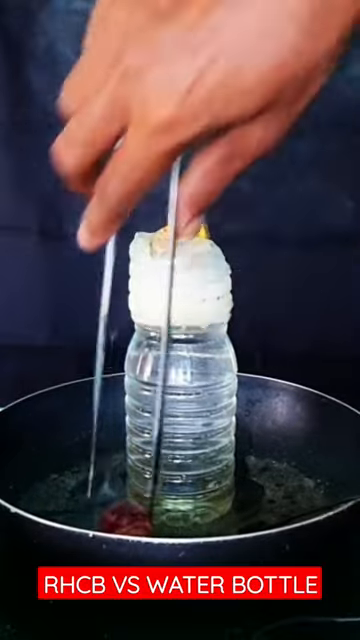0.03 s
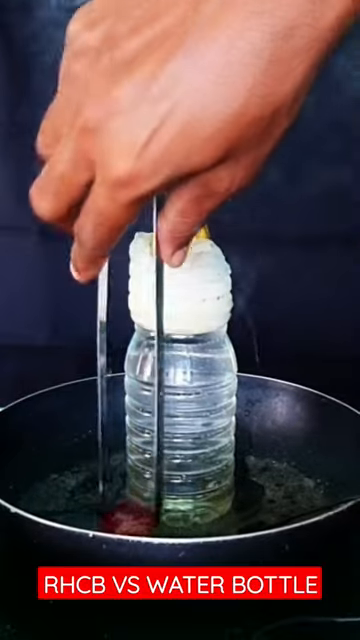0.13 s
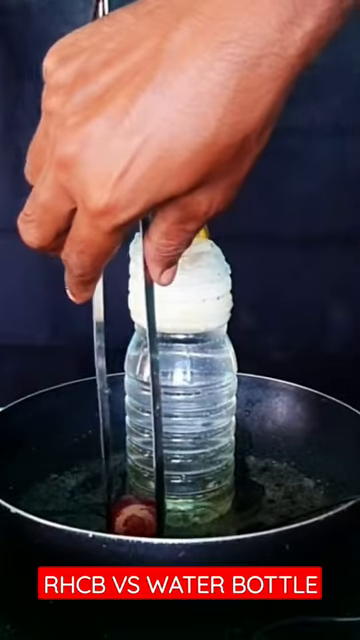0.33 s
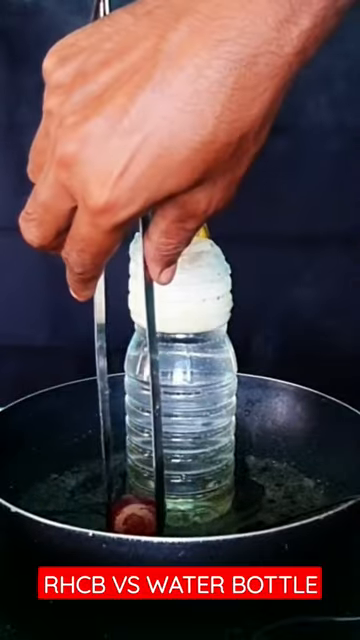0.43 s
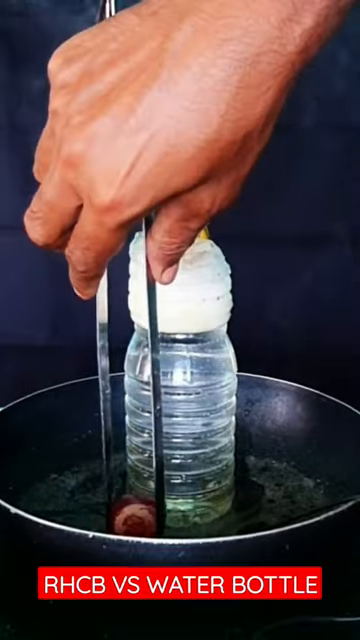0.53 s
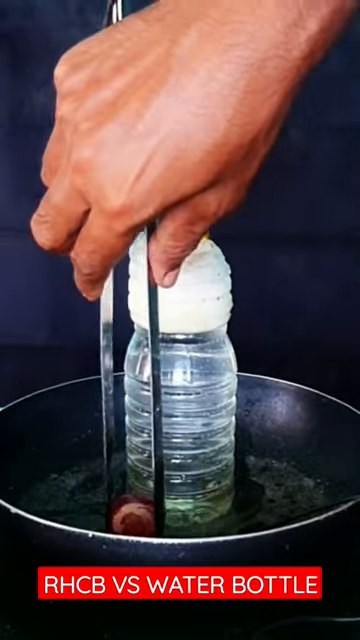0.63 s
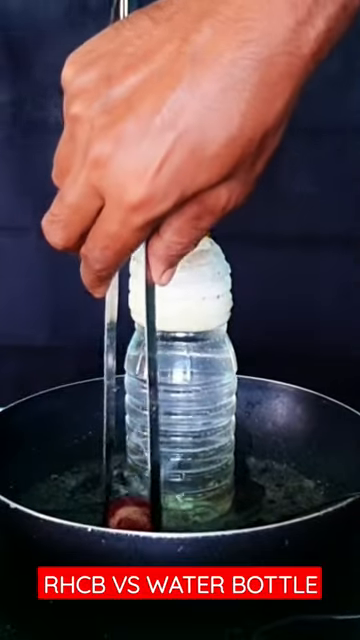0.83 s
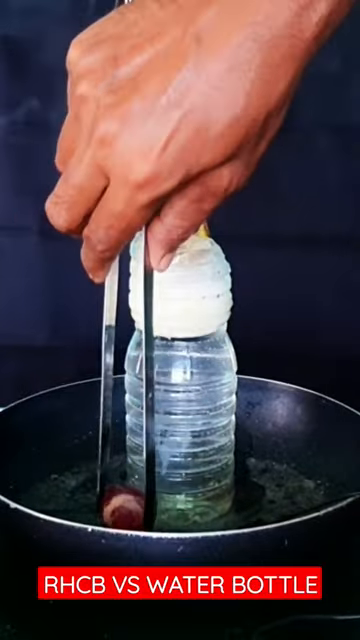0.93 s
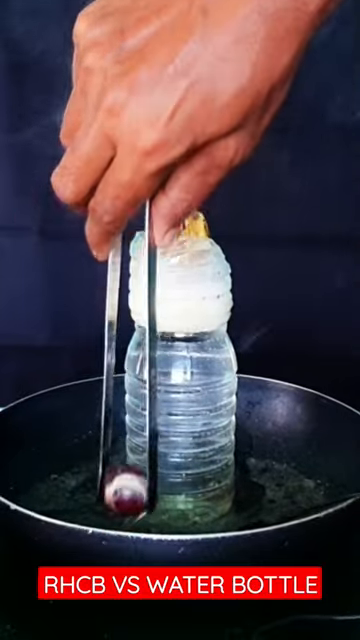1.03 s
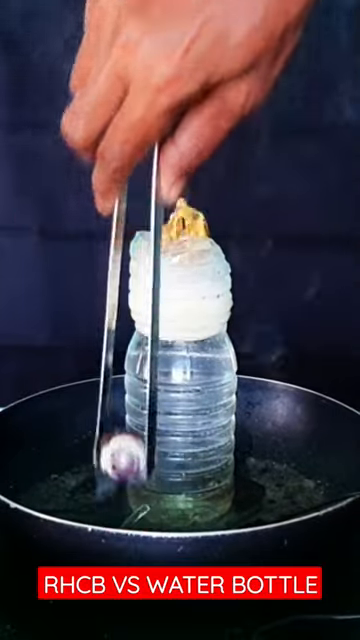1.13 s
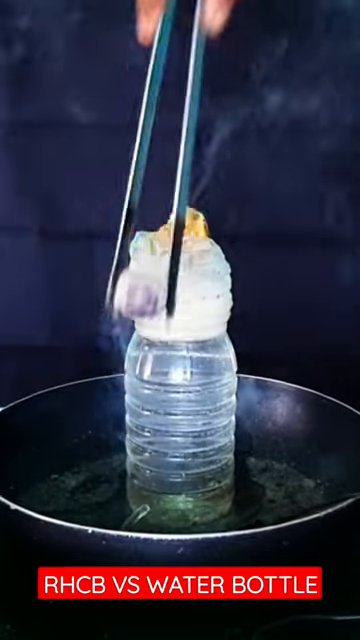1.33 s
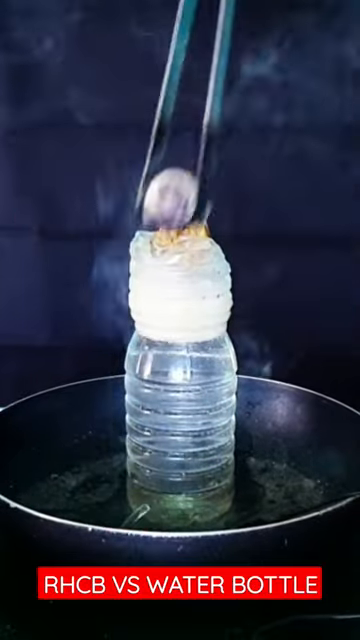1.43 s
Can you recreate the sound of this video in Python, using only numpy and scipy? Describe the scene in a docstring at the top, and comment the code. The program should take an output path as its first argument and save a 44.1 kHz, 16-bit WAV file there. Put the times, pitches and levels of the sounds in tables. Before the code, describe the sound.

A red-hot metal ball sizzles in shallow liquid in a frying pan. After a few faint ticks of tongs, it hisses, spits and bubbles close by, then sputters in high chirps as it is lifted and fizzes away.

```python
"""A red-hot metal ball hisses and spits in a shallow pool of liquid in a frying pan.
Tiny steam bursts crackle and ring a few broad resonances, larger bubbles plop, and the fluttering
vapour film shakes the level. A few ticks come first, as tongs set the ball down. On the lift it
sputters in sharp chirps, then the film left on it fizzes away in the air."""
import sys
import numpy as np
from scipy import signal
from scipy.fft import rfft, irfft, next_fast_len
from scipy.io import wavfile
from scipy.ndimage import map_coordinates

SR = 44100
rng = np.random.default_rng(int(sys.argv[2]) if len(sys.argv) > 2 else 0)


def bounce(signal):
    """Save signal as a 16-bit WAV file at the path given by the first command-line argument."""
    frames = np.transpose(np.atleast_2d(signal))
    limited = np.clip(frames, -1, 1)
    pcm = np.round(limited * 32767).astype(np.int16)
    wavfile.write(sys.argv[1], SR, pcm)


N = 66150

# room noise spectrum: freq_hz, gain_db
ROOM_EQ = [(20, -19), (55, 12), (75, 6), (100, 13), (135, -17), (200, -1.5), (400, -9.5), (1500, -26),
           (6000, -15), (15000, -18)]
# ticks as the ball nears the pan: start_s, drive_db
TICK_HITS = [(.042, -27), (.0447, -23.5), (.0515, -36), (.091, -41), (.0993, -37.5), (.1248, -32.5),
             (.151, -51), (.2177, -37)]
# tick spectrum: freq_hz, gain_db
TICK_EQ = [(100, -6.5), (450, -4.5), (750, 10), (1000, -5), (3400, -15), (4800, 3), (5900, -2), (7000, 4),
           (9000, -5), (10300, 6), (12500, -18), (15400, -12)]
# duller knocks among the ticks: start_s, drive_db
KNOCK_HITS = [(.0402, -34.5), (.0515, -42), (.1063, -37.5), (.172, -45.5)]
# knock spectrum: freq_hz, gain_db
KNOCK_EQ = [(100, -5), (500, -8), (800, 17), (1050, 2), (1400, 10.5), (3400, 1.5), (4800, 10), (6000, -10),
            (15000, -3)]
# spectrum of the closing pool: freq_hz, gain_db
SLOSH_EQ = [(30, -3), (70, 0), (210, 3), (400, -9), (1500, -29)]
# dull simmer of the liquid: time_s, level_db
SIMMER_ENV = [(.22, -69), (.26, -49), (.4, -41.5), (.7, -43), (.95, -40.5), (1.1, -38), (1.22, -39),
              (1.33, -42), (1.42, -47), (1.5, -49)]
# simmer spectrum: freq_hz, gain_db
SIMMER_EQ = [(40, -13.5), (190, -7), (420, -4), (1200, 1.5), (1850, 0), (2300, -4), (5000, -65.5)]
# ringing just before the lift: time_s, level_db
RING_ENV = [(.76, -110), (.82, -37), (.9, -26), (.962, -30), (.97, -21.5), (.99, -39), (1.04, -36.5),
            (1.1, -80)]
# resonances of that ringing: freq_hz, width_hz, gain_db
RING_BANDS = [(906, 200, -11.5), (1300, 110, -7), (2020, 91, -2)]
# whistling steam pockets: start_s, length_s, pitch_hz, level_db
WHISTLE_NOTES = [(.885, .075, 1935, -31), (.908, .04, 1290, -36), (.967, .027, 1960, -17.5),
                 (.968, .02, 890, -33), (.993, .055, 1240, -33), (.995, .07, 1915, -33)]
# large bubbles: start_s, pitch_hz, life_s, level_db
LARGE_BUBBLES = [(0.252, 2270, 0.0083, -19), (.279, 1420, 0.012, -28), (0.382, 959, 0.015, -25),
                 (0.396, 571, 0.0071, -35.5), (0.427, 880, 0.0048, -27.5), (.434, 536, 0.0093, -38),
                 (.574, 939, 0.017, -30.5)]
# small squeaking bubbles: start_s, pitch_hz, life_s, level_db
SMALL_BUBBLES = [(.391, 6140, 0.0022, -12), (.396, 7020, 0.0033, -21), (.604, 6130, 0.003, -23),
                 (.6095, 5050, .005, -17), (.6145, 6700, 0.0034, -25), (.669, 3000, 0.0039, -16),
                 (1.1995, 6920, .003, -20)]
# steam jet resonance: freq_hz, width_hz, gain_db
JET_BANDS = [(9100, 2900, 0)]
# spectrum of liquid boiling off the rising ball: freq_hz, gain_db
DRAIN_EQ = [(1000, -44), (2250, -4), (2600, 7.5), (3300, 9), (4000, 7), (5200, 4.5), (7000, 2.5),
            (15000, -30)]
# droplets popping on the metal: start_s, drive_db
DROPLET_POPS = [(.8435, -2), (1.306, -10), (1.3126, -9), (1.3225, -10), (1.379, -11), (1.3955, -14),
                (1.4454, -11)]
# collapsing steam pockets: start_s, length_s, level_db
SPIT_BURSTS = [(0.274, 0.0062, -21), (0.5445, 0.0096, -16), (0.674, 0.008, -44), (0.754, 0.0086, -18)]
# spit spectrum: freq_hz, gain_db
SPIT_EQ = [(200, -35), (900, -4.5), (1600, 0), (2100, 7), (3000, 6.5), (4100, 6), (4700, 3), (6400, 6),
           (8200, 1), (11000, 3), (15400, -11)]
# rushes of steam: start_s, length_s, level_db
SURGE_BURSTS = [(0.228, 0.0053, -31), (0.248, 0.012, -17.5), (0.323, 0.0095, -20.5), (0.341, 0.0087, -20.5),
                (0.352, 0.0045, -15), (0.358, 0.0061, -22), (0.374, 0.017, -19.5), (0.394, 0.0095, -15),
                (0.414, 0.016, -20.5), (0.429, 0.0194, -15), (0.722, 0.0091, -17), (0.774, 0.017, -17),
                (1.156, 0.0028, -9.5), (1.186, 0.012, -27)]
# surge spectrum: freq_hz, gain_db
SURGE_EQ = [(2000, -24), (4000, -13.5), (4900, -6.5), (5500, 4.5), (6600, 7), (7500, 3.5), (8400, 7.5),
            (10500, -5), (15400, -5.5)]
# chirps as the ball leaves the pool: time_s, pitch_hz, level_db
SPUTTER_ENV = [(.992, 11550, -34), (1, 9500, -5), (1.018, 7300, -12), (1.05, 7030, -7), (1.085, 5864, -8.5),
               (1.125, 6050, -8), (1.145, 5550, -15), (1.163, 6720, -6.5), (1.18, 7900, -38)]
# vapour film flutter, calmer in the air: time_s, depth_ratio
FLUTTER_ENV = [(1.16, 1.01), (1.21, 0.64)]
# boiling under the ball: time_s, level_db, pitch_ratio
BOIL_ENV = [(.228, -66, 1.16), (.25, -34.5, 1.04), (.3, -33, 0.97), (.42, -34, 0.98), (.47, -27, 1.05),
            (.53, -30.5, 1), (.57, -26, 1.03), (.65, -31.5, 1.094), (.68, -30, 1.054), (.77, -24, 1.02),
            (.84, -33, 1), (.91, -29, 0.91), (.99, -26, 1.01), (1.04, -44, 0.82), (1.1, -51, 0.79),
            (1.2, -88, 1)]
# boiling resonances: freq_hz, width_hz, gain_db
BOIL_BANDS = [(955, 236, -5.5), (1430, 110, -9.5), (1984, 153, 2), (2900, 430, 2.5), (3350, 370, -1),
              (3940, 120, 2)]
# sizzle where ball meets pool: time_s, level_db
SIZZLE_ENV = [(.222, -70), (.236, -10.5), (.255, -25.5), (.3, -36), (.37, -41), (.39, -31.5), (.46, -21),
              (.53, -27.5), (.6, -23.5), (.65, -21), (.72, -22.5), (.79, -20), (.82, -25), (.88, -23),
              (.96, -21), (1.02, -17.5), (1.11, -21), (1.19, -51), (1.23, -54), (1.28, -73)]
# sizzle resonances: freq_hz, width_hz, gain_db
SIZZLE_BANDS = [(3980, 72, 3.5), (5444, 360, 1.5), (6535, 155, 3.5), (7956, 460, 3), (8740, 850, -2),
                (9700, 640, -4.5)]
# fizz of the wetted surface: time_s, level_db
FIZZ_ENV = [(0, -82), (.178, -74), (.197, -51), (.226, -52), (.229, -23.5), (.255, -20.5), (.3, -24),
            (.44, -26), (.5, -27), (.57, -23.5), (.62, -28.5), (.72, -21.5), (.83, -29), (.89, -23),
            (.97, -22), (1.01, -23.5), (1.16, -16.5), (1.18, -20.5), (1.2, -17), (1.228, -32.5),
            (1.31, -30), (1.4, -35), (1.5, -40)]
# fizz spectrum: freq_hz, gain_db
FIZZ_EQ = [(300, -28.5), (1500, -14.5), (2300, -23.5), (2800, 2), (3400, 0), (4500, -1.5), (5500, 2.5),
           (9500, 4), (12500, 2.5), (15400, -1.5)]

CONTACT_S = 0.2382
TIME_S = np.arange(N) / SR


def amp(db):
    """dB to amplitude."""
    return 10 ** (np.asarray(db) / 20)


def unit(x):
    """Scale to rms 1."""
    return x / np.sqrt(np.mean(x ** 2) + 1e-20)


def curves(rows):
    """Per-sample curve for each column after time_s."""
    times_s, *columns = np.transpose(rows)
    return [np.interp(TIME_S, times_s, column) for column in columns]


def wobble(rate_hz):
    """Smooth random curve, knots at rate_hz."""
    return map_coordinates(rng.standard_normal(4000), [TIME_S * rate_hz + 2], mode="wrap")


def sine(pitch_hz):
    """Sine along a pitch curve."""
    return np.sin(2 * np.pi * np.cumsum(pitch_hz) / SR)


def puff(start_s, length_s, edge=0.13):
    """Linear attack, hold, exponential release; edge is a share of the length."""
    age = (TIME_S - start_s) / length_s
    return np.clip(age / edge, 0, 1) * np.exp(-np.maximum(age - 1 + edge, 0) / edge)


def swell(centre_s, sigma_s):
    """Gaussian envelope."""
    return np.exp(-.5 * ((TIME_S - centre_s) / sigma_s) ** 2)


def filtered(x, response):
    """Apply a complex frequency response."""
    size = 2 * next_fast_len(N)
    return irfft(rfft(x, size) * response(np.fft.rfftfreq(size, 1 / SR)), size)[:N]


def coloured(x, eq):
    """Minimum-phase filter through freq_hz, gain_db points."""
    def response(hz):
        freq_hz, gain_db = np.transpose(eq)
        gain = amp(np.interp(np.log(hz + 1), np.log(freq_hz), gain_db))
        cepstrum = irfft(np.log(gain))
        half = len(cepstrum) // 2
        cepstrum[1:half] *= 2
        cepstrum[half + 1:] = 0
        return np.exp(rfft(cepstrum))
    return filtered(x, response)


def resonate(x, bands):
    """Parallel resonators of alternating sign."""
    def response(hz):
        total = 0
        for k, (freq_hz, width_hz, gain_db) in enumerate(bands):
            damping = 1j * hz * width_hz
            total += (-1) ** k * amp(gain_db) * damping / (freq_hz ** 2 - hz ** 2 + damping)
        return total
    return filtered(x, response)


def highpass(x, edge_hz, order):
    """Cut below edge_hz."""
    return signal.sosfilt(signal.butter(order, edge_hz, "high", fs=SR, output="sos"), x)


def crackle(rate_hz, spread_db):
    """Tiny steam bursts: random impulses of uneven size."""
    fires = rng.random(N) < rate_hz / SR
    return fires * rng.standard_normal(N) * amp(spread_db * rng.standard_normal(N))


def strikes(hits, t60_s):
    """One fast-decaying noise crack per hit."""
    out = np.zeros(N)
    for start_s, drive_db in hits:
        decay = amp(drive_db - 60 * np.abs(TIME_S - start_s) / t60_s) * (TIME_S >= start_s)
        out += decay * rng.choice([-1, 1], N)
    return out


def room(x, t60_s=0.043, echo_db=-11, hum_hz=55, hum_db=-62.5, noise_db=-62):
    """Short weak echo, wavering hum, low noise."""
    tail_s = np.arange(SR // 3) / SR
    tail = rng.standard_normal(len(tail_s)) * amp(-60 * tail_s / t60_s)
    echo = signal.fftconvolve(x, tail / np.linalg.norm(tail))[:N]
    hum = amp(hum_db + 3.5 * wobble(21.2)) * np.sin(2 * np.pi * hum_hz * TIME_S + wobble(5.53))
    noise = amp(noise_db) * unit(coloured(rng.standard_normal(N), ROOM_EQ))
    return amp(echo_db) * echo + hum + noise


def ticks(crackle_db=-65):
    """Ticks and knocks over faint crackle before contact."""
    faint = amp(crackle_db) * unit(crackle(rate_hz=150, spread_db=2)) * (TIME_S < CONTACT_S)
    bright = coloured(strikes(TICK_HITS, t60_s=0.002) + faint, TICK_EQ)
    return bright + coloured(strikes(KNOCK_HITS, t60_s=0.004), KNOCK_EQ)


def slosh(level_db=-49):
    """The pool closes softly behind the ball."""
    noise = unit(coloured(rng.standard_normal(N), SLOSH_EQ))
    return amp(level_db) * puff(start_s=1.215, length_s=0.021) * noise


def simmer():
    """The liquid simmers in a dull crackle."""
    level_db, = curves(SIMMER_ENV)
    return amp(level_db) * unit(coloured(crackle(rate_hz=7000, spread_db=0), SIMMER_EQ))


def ring():
    """Boiling excites a few narrower resonances before the lift."""
    level_db, = curves(RING_ENV)
    ringing = resonate(rng.standard_normal(N), RING_BANDS)
    return amp(level_db) * unit(highpass(ringing, edge_hz=565, order=3))


def whistles(sag_per_s=0.39, waver_ratio=0.0115, waver_db=3):
    """Steam pockets whistle as the ball starts to rise; the tones waver and sink."""
    out = np.zeros(N)
    for start_s, length_s, pitch_hz, level_db in WHISTLE_NOTES:
        glide_hz = pitch_hz * (1 - sag_per_s * (TIME_S - start_s) + waver_ratio * wobble(250))
        out += amp(level_db + waver_db * wobble(140)) * puff(start_s, length_s) * sine(glide_hz)
    return out


def bubbles(rows, rough_ratio, rough_db=2, sag_ratio=.07):
    """Each bubble rings roughly and drops in pitch as it swells."""
    out = np.zeros(N)
    for start_s, pitch_hz, life_s, level_db in rows:
        growth = np.clip((TIME_S - start_s) / life_s - .5, -1, 1)
        glide_hz = pitch_hz * (1 - sag_ratio * growth + rough_ratio * wobble(900))
        envelope = amp(level_db + rough_db * wobble(700)) * puff(start_s, life_s, edge=0.17)
        out += envelope * sine(glide_hz)
    return out


def jet(flutter, level_db=-21, flutter_db=1.5):
    """A thin, high jet of steam squeezed from under the ball."""
    hiss = unit(resonate(resonate(rng.standard_normal(N), JET_BANDS), JET_BANDS))
    return amp(level_db + flutter_db * flutter) * swell(centre_s=0.894, sigma_s=0.05) * hiss


def drain(flutter, level_db=-23.5, flutter_db=1.2):
    """Liquid boils off the rising ball."""
    hiss = unit(coloured(crackle(rate_hz=4300, spread_db=-7), DRAIN_EQ))
    return amp(level_db + flutter_db * flutter) * swell(centre_s=1.112, sigma_s=0.078) * hiss


def pops():
    """Each droplet snaps with a single pulse."""
    pulses = np.zeros(N)
    for start_s, drive_db in DROPLET_POPS:
        pulses[round(start_s * SR)] = amp(drive_db)
    return coloured(pulses, FIZZ_EQ)


def spits():
    """Steam pockets collapse in abrupt broadband bursts."""
    envelope = sum(amp(db) * puff(start_s, length_s, edge=0.12) for start_s, length_s, db in SPIT_BURSTS)
    return envelope * unit(coloured(crackle(rate_hz=9200, spread_db=1), SPIT_EQ))


def surges():
    """Steam escapes in short, shrill rushes."""
    envelope = sum(amp(db) * puff(start_s, length_s) for start_s, length_s, db in SURGE_BURSTS)
    return envelope * unit(coloured(crackle(rate_hz=9000, spread_db=1), SURGE_EQ))


def sputter(gap_s=0.0035, rise_s=0.00073, size_db=2, detune_ratio=.09, rough_ratio=.06, splash_db=-5):
    """Steam escapes in a fast uneven train of chirps, mostly falling, each with a noise splash."""
    pitch_hz, level_db = curves(SPUTTER_ENV)
    first_s, last_s = SPUTTER_ENV[0][0], SPUTTER_ENV[-1][0]
    gaps, sizes, detunes = rng.standard_normal((60, 3)).T
    starts_s = first_s + np.cumsum(gap_s * np.exp(0.27 * gaps))
    pulses = np.zeros(N)
    for start_s, size in zip(starts_s, sizes):
        age = np.maximum(TIME_S - start_s, 0) / rise_s
        pulses += amp(size_db * size) * (age * np.exp(1 - age)) ** 2 * (start_s < last_s)
    bend = detune_ratio * np.interp(TIME_S, starts_s, detunes) + rough_ratio * wobble(1500)
    splash = amp(splash_db) * unit(coloured(rng.standard_normal(N), FIZZ_EQ))
    return amp(level_db) * pulses * (sine(pitch_hz * np.exp(bend)) + splash)


def boil(flutter, flutter_db=1.5):
    """Coarse bursts under the ball ring low resonances that drift in pitch."""
    level_db, pitch_ratio = curves(BOIL_ENV)
    ringing = highpass(resonate(crackle(rate_hz=3000, spread_db=0), BOIL_BANDS), edge_hz=380, order=3)
    drifting = map_coordinates(ringing, [np.cumsum(pitch_ratio)], mode="mirror")
    return amp(level_db + flutter_db * flutter) * unit(drifting)


def sizzle(flutter, flutter_db=0.6):
    """Steam bursts at the contact ring high resonances."""
    level_db, = curves(SIZZLE_ENV)
    ringing = resonate(crackle(rate_hz=9000, spread_db=-1), SIZZLE_BANDS)
    return amp(level_db + flutter_db * flutter) * unit(highpass(ringing, edge_hz=3260, order=4))


def fizz(flutter, flutter_db=1.5):
    """Dense bright crackle of the film on the metal."""
    level_db, = curves(FIZZ_ENV)
    hiss = unit(coloured(crackle(rate_hz=20000, spread_db=-1), FIZZ_EQ))
    return amp(level_db + flutter_db * flutter) * hiss


def wetting(x, open_s=0.011, edge_hz=8600):
    """The first bursts are the smallest and highest: the hiss opens downwards on contact."""
    wet = np.clip((TIME_S - CONTACT_S) / open_s, 0, 1) ** 2
    treble = filtered(x, lambda hz: 1 - 1 / (1 + (hz / edge_hz) ** 4))
    return wet * x + (1 - wet) * treble


def hollow(x, start_s=1.114, fade_s=0.067, notch_hz=2206, width_hz=210):
    """A narrow band drops out of the hiss as the ball rises."""
    risen = np.clip((TIME_S - start_s) / fade_s, 0, 1)
    band = filtered(x, lambda hz: np.exp(-((hz - notch_hz) / (width_hz / 2)) ** 2))
    return x - risen * band


def scene():
    """Mono mix; one vapour film flutter drives fizz, sizzle, boil, drain and jet."""
    depth, = curves(FLUTTER_ENV)
    flutter = unit(wobble(420) + wobble(110)) * depth
    plops = bubbles(LARGE_BUBBLES, rough_ratio=.085) + bubbles(SMALL_BUBBLES, rough_ratio=.07)
    hiss = wetting(fizz(flutter) + sizzle(flutter) + surges())
    in_pool = hiss + boil(flutter) + simmer() + ring() + whistles() + spits() + plops
    lift = sputter() + drain(flutter) + slosh() + pops() + jet(flutter)
    direct = hollow(in_pool + lift) + ticks()
    return (direct + room(direct))[None]


def record(dry, top_hz=15480, ceiling=.8):
    """Soft clip between two steep low-passes."""
    def lowpass(hz):
        return 1 / np.sqrt(1 + (hz / top_hz) ** 300)
    x = filtered(dry[0], lowpass)
    rounded = x / (1 + np.abs(x / ceiling) ** 6) ** (1 / 6)
    return filtered(rounded, lowpass)[None]


dry = scene()
out = record(dry)
bounce(out)
```